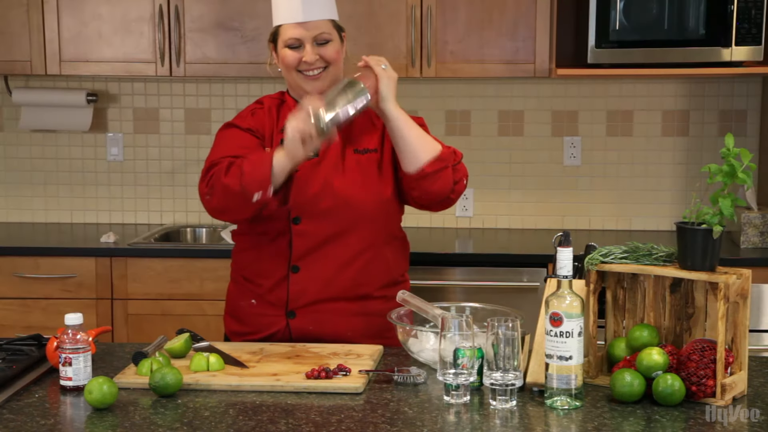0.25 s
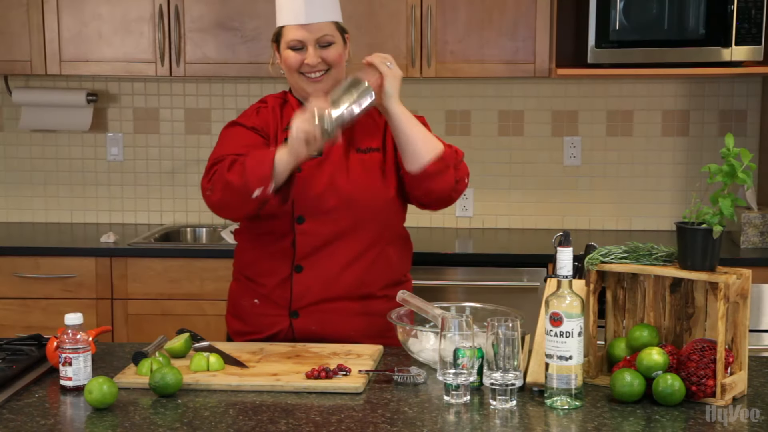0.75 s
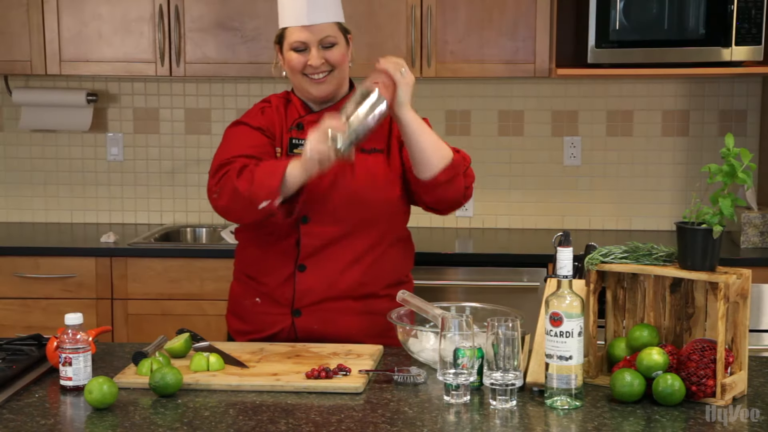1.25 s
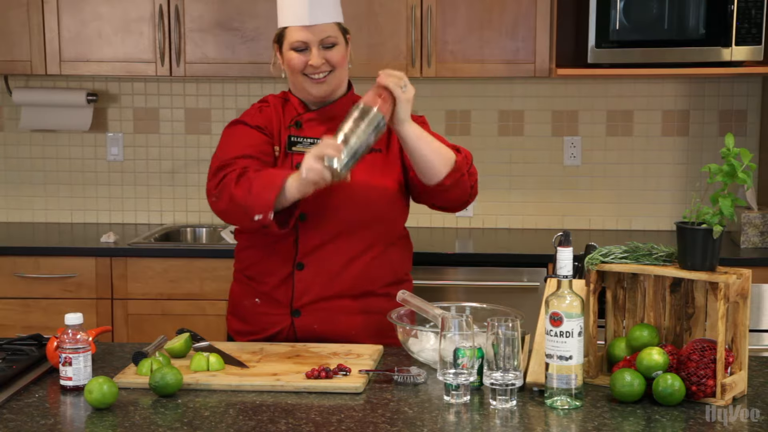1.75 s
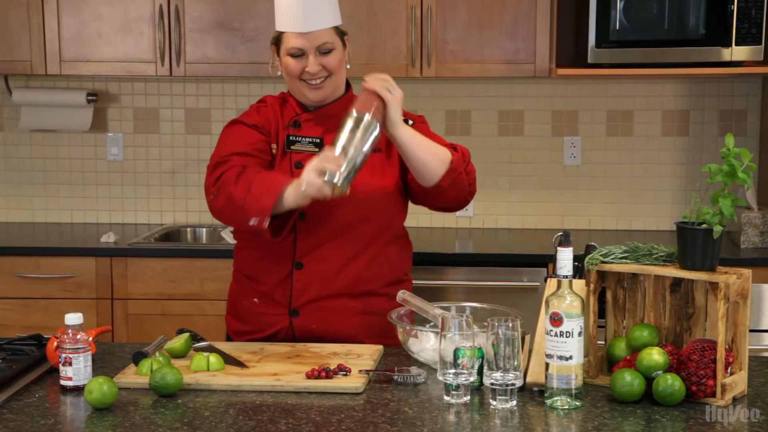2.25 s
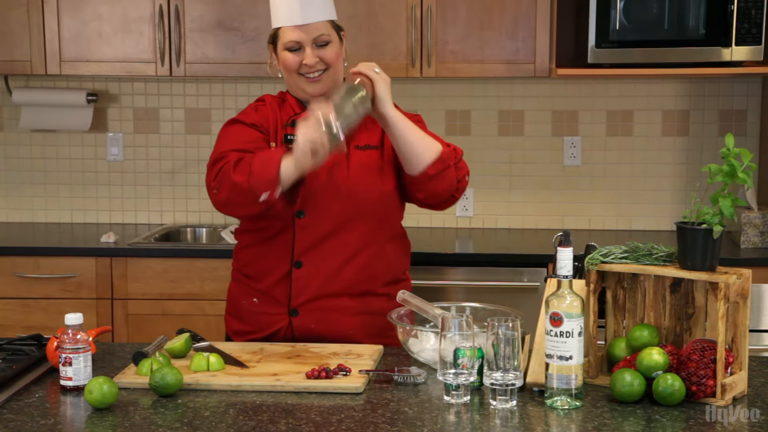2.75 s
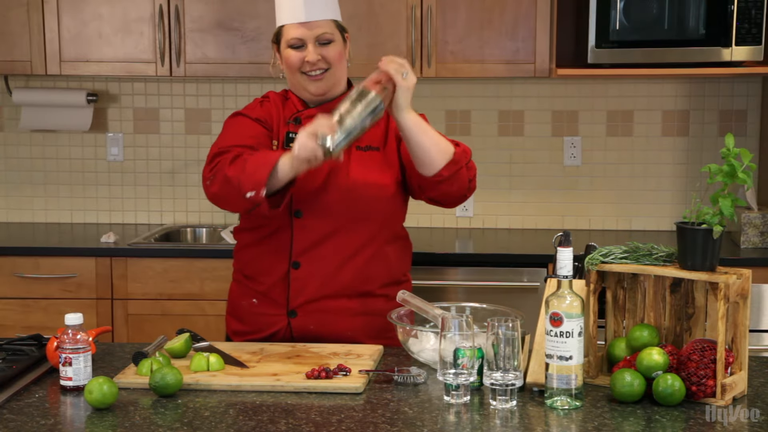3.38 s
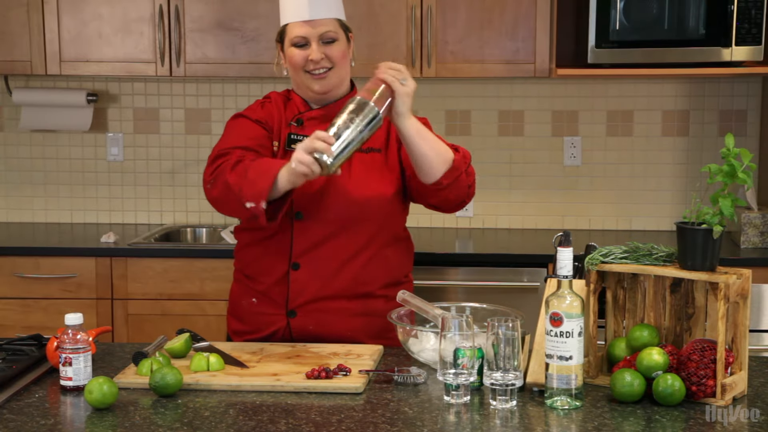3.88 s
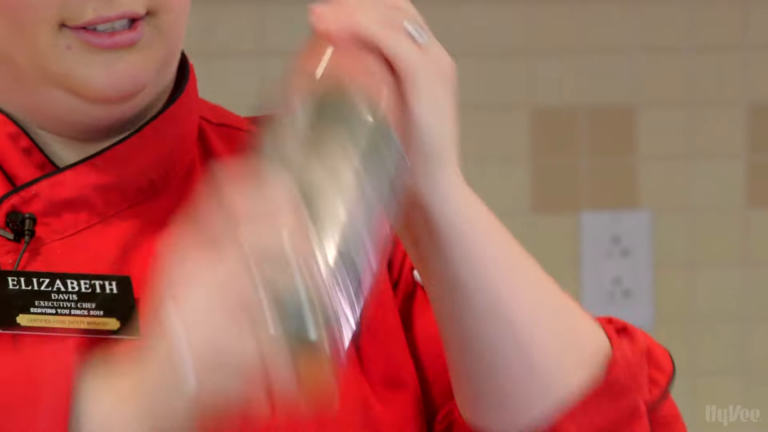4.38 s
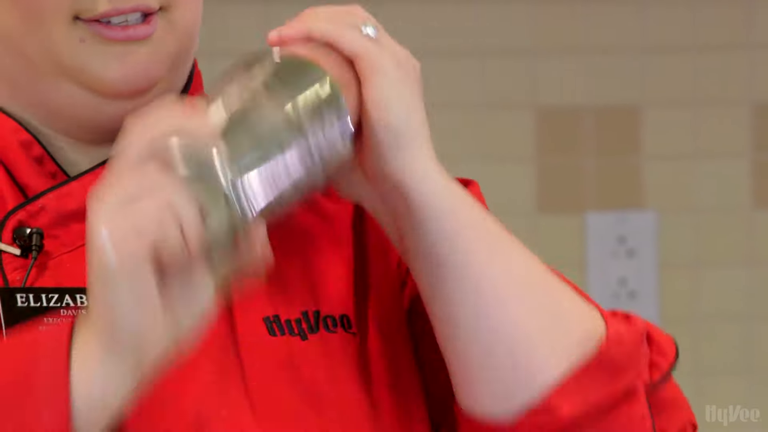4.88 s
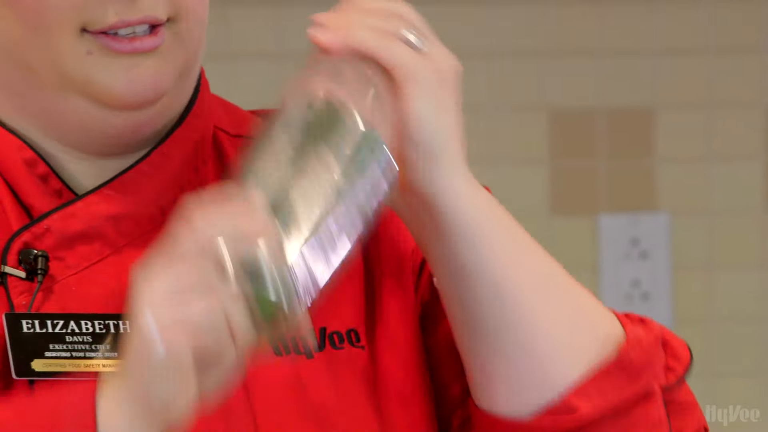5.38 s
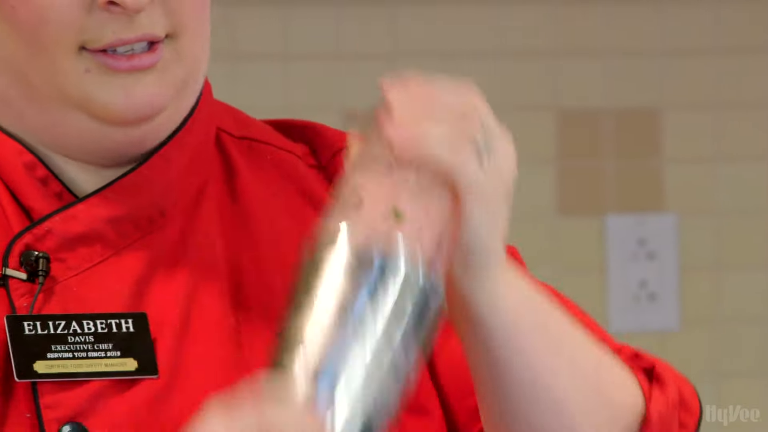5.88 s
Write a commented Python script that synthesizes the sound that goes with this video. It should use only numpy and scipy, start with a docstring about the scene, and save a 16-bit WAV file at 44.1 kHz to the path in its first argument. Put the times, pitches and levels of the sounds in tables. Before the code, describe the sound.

Hard cocktail shaking fills about six seconds, starting mid-action and continuing to the end. Ice and liquid hit the ends of a steel and glass shaker seven or eight times a second, slightly irregularly. Each stroke mixes dense icy ticks, several bright, crunchy clacks and a wet hiss, damped within milliseconds by hands and liquid. Bubbly sloshes are clearest in the first second, with a few more between 2 and 3.4 and near 5.9. Strong knocks and hollow thuds cluster around 1.5; another heavy one lands near 3.9. Strokes soften around 2.9 to 3.4, then recover. Hard clatter stands out around 5.1 to 5.2, and the strongest bursts come around 5.7 to 5.9, with more brittle, splintery treble. One close microphone, slightly left, catches short kitchen reflections and faint low rumble.

```python
"""Hard shake of ice and liquid

Ice and liquid are shaken in a steel tin capped with a glass, at one microphone in a kitchen.
Seven or eight times a second the load reaches an end: chips tick, cubes clatter, liquid sprays.
Knocks and slams are noise-excited modes, damped to milliseconds by hands and liquid; gulps are
sine bubbles, spray and rumble are coloured noise, and the kitchen adds sparse reflections."""
import sys
import numpy as np
from scipy import signal
from scipy.fft import rfft, irfft
from scipy.io import wavfile
from scipy.ndimage import uniform_filter1d

SR = 44100
rng = np.random.default_rng(int(sys.argv[2]) if len(sys.argv) > 2 else 0)


def store_wav(level_fs):
    """Save 16-bit WAV to argv[1]."""
    pcm = np.round(np.clip(np.atleast_2d(level_fs), -1, 1) * 32767)
    wavfile.write(sys.argv[1], SR, pcm.T.astype(np.int16))


N = 270316
RING_SAMPLES, KNOCK_S = 1024, 0.005


def amp(db):
    """Decibels to linear gain."""
    return 10 ** (np.asarray(db) / 20)


def evened(x):
    """Scales a signal to RMS 1."""
    return x / np.sqrt(np.mean(x ** 2) + 1e-20)


def read(points, hz):
    """Joins (frequency, value) points by straight lines over log frequency."""
    point_hz, value = np.transpose(points)
    return np.interp(np.log(hz + 1), np.log(point_hz), value)


def noise(spectrum):
    """Steady coloured noise of RMS 1."""
    hz = np.fft.rfftfreq(N, 1 / SR)
    white = rfft(rng.standard_normal(N))
    return evened(irfft(white * amp(read(spectrum, hz)), N))


def place(start_s, sounds):
    """Sums short sounds, one a row, at their start times."""
    first = np.round(np.clip(start_s, 0, None) * SR).astype(int)
    at = first[:, None] + np.arange(sounds.shape[1])
    return np.bincount(at.ravel(), sounds.ravel(), N)[:N]


def pitches(hz, octaves, count):
    """Random pitches scattered round a centre."""
    return hz * 2 ** (octaves * rng.standard_normal(count))


def strike(modes, pitch_hz, focus_db, vary_db, click, crush_s):
    """Blows on damped modes, one a row, each of RMS 1 if its energy is spread over KNOCK_S."""
    hz = np.fft.rfftfreq(RING_SAMPLES, 1 / SR)
    t = np.arange(RING_SAMPLES) / SR
    count = len(pitch_hz)
    gain = np.zeros((count, len(hz)))
    for centre_hz, width_hz, level_db in modes:
        # the spot hit weights each mode; moving liquid varies its tuning and damping
        spot, load, wet = rng.standard_normal((3, count, 1))
        # a contact favours modes near its own pitch, by focus_db an octave
        away_db = focus_db * abs(np.log2(centre_hz / pitch_hz))[:, None]
        half_width_hz = width_hz * np.exp(0.19 * wet) / 2
        offset = (hz - centre_hz - 0.17 * width_hz * load) / half_width_hz
        gain += amp(level_db + vary_db * spot - away_db) / (1 + offset ** 2)

    # minimum phase: the ring starts at the contact
    log_gain = np.log(np.hstack([gain, gain[:, -2:0:-1]]) + 1e-9)
    causal = np.exp(np.conj(signal.hilbert(log_gain, axis=1)))[:, :len(hz)]

    # a small click, then a brief crunch as the corner of the cube gives way
    age = t / (crush_s * np.exp(0.51 * rng.standard_normal((count, 1))))
    crunch = rng.standard_normal((count, RING_SAMPLES)) * np.sqrt(age) * np.exp(-age)
    contact = click + rfft(crunch / np.linalg.norm(crunch, axis=1, keepdims=True))

    blows = irfft(causal * contact, RING_SAMPLES)
    return blows * np.sqrt(KNOCK_S * SR) / np.linalg.norm(blows, axis=1, keepdims=True)


def bubble(hz, cycles, rise_per_s):
    """Pockets of air ring for a few cycles, rising in pitch; one a row."""
    t = np.arange(2 * RING_SAMPLES) / SR
    turns = hz[:, None] * t * (1 + rise_per_s * t)
    return np.sin(2 * np.pi * turns) * (1 - np.exp(-turns)) * np.exp(-turns / cycles)


# room and moving arms: hz [Hz], density_db [relative dB per Hz]
RUMBLE_SPECTRUM = [(30, 7), (120, -2), (220, -10.5), (380, -7), (900, -38), (18000, -54)]


def rumble():
    """Steady low noise of the room and the moving arms."""
    return amp(-69) * noise(RUMBLE_SPECTRUM)


# strokes of the arms, up or down: arrival_s [s], level_db [relative dB], pile_up_s [s]
ARM_STROKES = [(0.03, -48.5, 0.079), (0.18, -48.5, 0.094), (0.32, -48.0, 0.077), (0.455, -47.5, 0.13),
               (0.629, -53.5, 0.12), (0.719, -50.5, 0.056), (0.885, -50.5, 0.12), (0.999, -49.5, 0.045),
               (1.096, -46, 0.07), (1.227, -51.5, 0.11), (1.361, -49, 0.051), (1.481, -47, 0.12),
               (1.625, -47, 0.083), (1.771, -53.5, 0.11), (1.906, -52, 0.1), (2.056, -49, 0.1),
               (2.167, -46.5, 0.056), (2.326, -47.5, 0.12), (2.449, -48, 0.079), (2.57, -48, 0.059),
               (2.7, -47, 0.11), (2.842, -47.5, 0.048), (2.983, -51, 0.12), (3.089, -53, 0.091),
               (3.227, -55.5, 0.12), (3.388, -53.5, 0.13), (3.485, -48, 0.037), (3.572, -49.5, 0.046),
               (3.664, -47.5, 0.056), (3.793, -50.5, 0.083), (3.958, -49.5, 0.1), (4.055, -50.5, 0.073),
               (4.161, -51, 0.11), (4.26, -52, 0.13), (4.39, -49.5, 0.12), (4.527, -50.5, 0.082),
               (4.678, -51, 0.1), (4.797, -49.5, 0.08), (4.949, -47, 0.092), (5.096, -46.5, 0.084),
               (5.211, -49.5, 0.049), (5.369, -54, 0.11), (5.501, -49, 0.11), (5.64, -48.5, 0.11),
               (5.78, -44.5, 0.067), (5.911, -48.5, 0.096), (5.98, -48, 0.084), (6.103, -48.5, 0.07)]
FLIGHT_DB = -58  # churning while the load is in flight


def churning():
    """Gain per sample: swells and dies away round each stroke, over a constant floor."""
    t = np.arange(0, N / SR + .002, .002)
    arrival_s, level_db, pile_up_s = np.transpose(ARM_STROKES)
    swell = np.exp(-(2 * (t[:, None] - arrival_s) / pile_up_s) ** 2)
    power = (amp(level_db) ** 2 * swell).sum(1) + amp(FLIGHT_DB) ** 2
    return np.interp(np.arange(N) / SR, t, np.sqrt(power))


# mode tables, all: centre_hz [Hz], width_hz [Hz], level_db [relative dB]
# hand-damped shaker wall
WALL_MODES = [(1763, 364, 0.5), (2060, 1130, -9.5), (2807, 354, -7), (3160, 430, -5), (3560, 770, -9)]
# hard ice on steel
SNAP_MODES = [(4220, 1300, -5), (5074, 660, 2), (6070, 770, -11.5), (6510, 1300, -0.5), (7130, 550, -2.5)]
# thin steel ringing under splinters of ice
FIZZ_MODES = [(9300, 2600, 2.5), (11820, 460, -4), (12870, 1400, -1), (15000, 1200, -3),
              (17800, 1500, -0.5)]
# liquid-loaded ends
END_MODES = [(203, 510, 7), (525, 184, -7.5), (733, 240, -7.5), (963, 310, -4)]


def chips(per_s, spread_db):
    """Small pieces tick on the wall and each other, varied in size and colour."""
    start_s = np.flatnonzero(rng.random(N) < per_s / SR) / SR
    size_db = spread_db * np.minimum(rng.exponential(1, len(start_s)), 3)
    layers = (
        (WALL_MODES, 2500, -4),
        (SNAP_MODES, 5700, -6),
        (FIZZ_MODES, 11500, -15),
        (END_MODES, 750, -14),
    )
    out = np.zeros(N)
    for modes, hz, level_db in layers:
        pitch_hz = pitches(hz, 0.2, count=120)
        ticks = strike(modes, pitch_hz, focus_db=13, vary_db=5, click=0.47, crush_s=0.00076)
        gain = amp(size_db + 3.7 * rng.standard_normal(len(start_s)))
        chosen = ticks[rng.integers(0, len(ticks), len(start_s))]
        layer = place(start_s, gain[:, None] * chosen)
        # the pieces share the energy of the stroke
        local_power = abs(uniform_filter1d(layer ** 2, size=3000))
        out += amp(level_db) * layer / np.sqrt(local_power + 0.018 * np.mean(layer ** 2))
    return out * churning()


def froth(per_s):
    """Small bubbles at random instants, following the churning."""
    start_s = np.flatnonzero(rng.random(N) < per_s / SR) / SR
    size, pitch = rng.standard_normal((2, len(start_s)))
    bubbles = bubble(640 * np.exp(0.24 * pitch), cycles=2.54, rise_per_s=1.6)
    mix = place(start_s, amp(9.4 * np.tanh(size))[:, None] * bubbles)
    return amp(-16.5) * evened(mix) * churning()


# liquid and slush: hz [Hz], density_db [relative dB per Hz]
SPRAY_SPECTRUM = [(200, -15), (550, -10), (1300, 7), (1780, 7), (3000, 6), (7000, -5.5), (9000, -5.5),
                  (18000, -32)]


def spray():
    """Liquid and slush hiss as coloured noise, following the churning."""
    return amp(-14.0) * noise(SPRAY_SPECTRUM) * churning()


# level against the stroke, its scatter, snap against ring
CUBE_DB, CUBE_SCATTER_DB, CUBE_SNAP_DB = 1.5, 1.5, -3.5
CUBE_SPREAD, CUBE_HZ = 1.25, 2600  # landing span in pile-up lengths, centre pitch


def light_cubes(count):
    """Lighter cubes land one after another at each stroke, struck like the whole cubes."""
    arrival_s, level_db, pile_up_s = np.repeat(ARM_STROKES, count, axis=0).T
    total = len(arrival_s)
    turn = (np.arange(total) % count + rng.random(total)) / count - .5
    force, pitch, snap = rng.standard_normal((total, 3)).T
    start_s = arrival_s + CUBE_SPREAD * pile_up_s * turn
    wall_db = level_db + CUBE_DB + CUBE_SCATTER_DB * force
    wall_hz = CUBE_HZ * 2 ** (0.2 * pitch)
    snap_db = wall_db + CUBE_SNAP_DB + 3.1 * snap
    return knocks(np.transpose([start_s, wall_db, wall_hz, snap_db]))


# hardest knocks of whole cubes:
# start_s [s], wall_db [relative dB], wall_hz [contact pitch, Hz], snap_db [relative dB]
HARD_KNOCKS = [(0.064, -47, 2780, -43), (0.0763, -47.5, 2700, -42), (0.3089, -36.5, 2840, -39.5),
               (0.3374, -40, 2120, -40), (0.403, -46, 2930, -50), (0.488, -40.0, 2670, -65),
               (0.5981, -42.5, 2520, -46), (0.6261, -49, 3060, -38), (0.7161, -40, 2250, -54),
               (0.8003, -42.5, 2380, -47), (0.9357, -57, 2890, -43.5), (1.096, -36.5, 3050, -43.5),
               (1.2344, -45.5, 2770, -43.5), (1.33, -46.0, 2470, -57), (1.3816, -40.5, 2390, -45),
               (1.391, -37.5, 2640, -47), (1.4155, -42.5, 3040, -41), (1.478, -37.5, 2820, -53),
               (1.4861, -36, 2490, -46.5), (1.5662, -45, 1930, -43), (1.5973, -39, 3100, -38.5),
               (1.645, -44.5, 2630, -44.5), (1.6757, -41.5, 2650, -45), (1.7657, -43.5, 2430, -50.5),
               (1.8961, -42, 2700, -41), (2.1736, -45, 2190, -51.0), (2.1967, -42.0, 2640, -42.5),
               (2.3, -45.5, 2940, -52.5), (2.3161, -36.5, 2580, -55), (2.3631, -42, 1950, -53.0),
               (2.4245, -41, 2720, -37.5), (2.502, -43.0, 2490, -44), (2.5501, -47, 3140, -48.0),
               (2.5814, -43.0, 3000, -50), (2.6789, -40.5, 2950, -45.5), (2.8091, -41.0, 2650, -44.5),
               (2.8402, -41, 2660, -48), (2.863, -42.5, 2150, -61), (3.0016, -41.5, 2350, -41),
               (3.043, -43.5, 2920, -44.5), (3.0905, -37.5, 2770, -46), (3.1351, -42.5, 2460, -50.0),
               (3.1987, -40.5, 2100, -57), (3.2432, -43, 2530, -54), (3.3254, -45.5, 3080, -46.0),
               (3.3469, -42, 2900, -43.0), (3.4644, -48.0, 2590, -46.5), (3.541, -40.5, 2760, -45),
               (3.5578, -38, 3220, -40), (3.651, -42.5, 2190, -50), (3.7407, -41.5, 2030, -68),
               (3.8098, -43, 2800, -47.5), (3.8894, -40.5, 2800, -50), (3.9464, -41.5, 2870, -44),
               (3.9743, -42, 2900, -56), (4.0312, -46, 2580, -43.5), (4.0406, -44.0, 2570, -41),
               (4.076, -45, 3030, -41.5), (4.1263, -39.5, 2290, -43.5), (4.136, -44.0, 2830, -42),
               (4.1487, -38.5, 2840, -40.0), (4.2514, -44, 2170, -55), (4.2818, -45.5, 2580, -47.5),
               (4.428, -38.5, 2860, -43), (4.4424, -45, 2750, -47.5), (4.51, -41, 3050, -46.0),
               (4.5379, -38.5, 2570, -44.5), (4.624, -48, 2990, -45), (4.6352, -40, 2340, -38.5),
               (4.7759, -48, 2720, -43), (4.9146, -40.0, 2400, -43), (4.9256, -46.5, 2650, -42),
               (4.9486, -44.5, 2370, -45), (4.957, -40, 2750, -45), (5.0606, -44, 2900, -42.5),
               (5.0721, -36, 2290, -40.5), (5.1, -39.5, 3000, -41.5), (5.1719, -39.5, 1840, -48),
               (5.1916, -39.5, 1840, -48), (5.2047, -42, 3200, -47.5), (5.226, -37, 2670, -39.5),
               (5.51, -45.5, 2310, -48), (5.5359, -41, 2590, -43), (5.5961, -46.5, 2490, -45),
               (5.6611, -34.5, 2570, -45.0), (5.7463, -41, 2070, -44), (5.7774, -39, 2560, -40),
               (5.7896, -38, 2990, -40), (5.8055, -48, 3050, -39.5), (5.859, -39.5, 2500, -50),
               (5.8765, -39.5, 2880, -48), (5.8965, -41.5, 2840, -44), (5.9362, -41, 2680, -42),
               (5.9477, -39.5, 2760, -46.5), (6.0174, -39, 2260, -51.5)]


def knocks(rows):
    """Cubes hit the shaker: the wall and ends ring, the ice snaps and splinters."""
    start_s, wall_db, wall_hz, snap_db = np.transpose(rows)
    count = len(start_s)
    snap_hz = pitches(5560, 0.29, count)
    fizz_hz = pitches(10900, 0.29, count)
    body_hz = pitches(790, 0.37, count)
    wall = strike(WALL_MODES, wall_hz, focus_db=21.0, vary_db=1.0, click=0.56, crush_s=0.0013)
    snap = strike(SNAP_MODES, snap_hz, focus_db=16.0, vary_db=1.5, click=0.38, crush_s=0.0012)
    fizz = strike(FIZZ_MODES, fizz_hz, focus_db=18, vary_db=3.5, click=0.3, crush_s=0.0019)
    body = strike(END_MODES, body_hz, focus_db=13.0, vary_db=4.5, click=1, crush_s=0.002)
    # splinters follow the blow, louder with time as the ice breaks up
    blow_db = np.maximum(snap_db - 14.5, wall_db - 20.0)
    fizz_db = blow_db + 0.65 * start_s + 2.8 * rng.standard_normal(count)
    ring = amp(wall_db - 0.5)[:, None] * (wall + amp(-12.5) * body)
    crack = amp(snap_db - 0.6)[:, None] * snap + amp(fizz_db)[:, None] * fizz
    return place(start_s - .0005, ring + crack)


# loudest sloshes: start_s [s], level_db [relative dB], pitch_hz [centre, Hz]
SLOSHES = [(0.182, -46.5, 910), (0.445, -47.5, 760), (0.72, -47.5, 870), (0.987, -43, 786),
           (2.017, -52.5, 815), (2.135, -50.5, 780), (2.844, -49, 848), (3.131, -47.5, 910),
           (3.412, -49, 720), (5.941, -49.5, 593)]


def gulps():
    """Each slosh folds in air that breaks into a clump of nine bubbles."""
    start_s, level_db, pitch_hz = np.repeat(SLOSHES, repeats=9, axis=0).T
    late, size = rng.standard_normal((len(start_s), 2)).T
    bubbles = bubble(pitch_hz * np.exp(0.12 * size), cycles=1.75, rise_per_s=2.3)
    return place(start_s - .003 + 0.008 * late, amp(level_db + 8.0)[:, None] * bubbles)


# heaviest slams, dull or hollow: start_s [s], level_db [relative dB], pitch_hz [Hz]
HEAVY_SLAMS = [(0.338, -51.5, 650), (0.489, -48.5, 615), (0.625, -52, 280), (1.479, -41, 860),
               (1.491, -40.5, 710), (1.549, -45, 660), (1.596, -48, 335), (1.757, -45.5, 870),
               (1.897, -49, 407), (2.425, -48.5, 450), (2.502, -50, 398), (2.55, -45, 676),
               (2.679, -47, 477), (3.002, -50, 392), (3.644, -45.5, 865), (3.889, -41.5, 715),
               (4.077, -49, 425), (4.498, -47.5, 404), (5.048, -44.5, 794), (5.06, -47.5, 760),
               (5.805, -46.5, 454), (5.95, -48, 530)]


def slams():
    """The whole load stops at one end and thuds on its low modes."""
    start_s, level_db, pitch_hz = np.transpose(HEAVY_SLAMS)
    thuds = strike(END_MODES, pitch_hz, focus_db=24.5, vary_db=3.5, click=1.75, crush_s=0.0011)
    return place(start_s, amp(level_db)[:, None] * thuds)


# kitchen decay: hz [Hz], t60_s [s]
KITCHEN_DECAY = [(3000, 0.079), (16000, 0.19)]


def kitchen(x):
    """Sparse reflections from counter, tiles and cupboards, decaying at a rate set by frequency."""
    taps = rng.choice([-1., 1.], SR // 2) * (rng.random(SR // 2) < 3000 / SR)
    taps[:round(.004 * SR)] = 0
    hz, t, bins = signal.stft(taps, SR, nperseg=256)
    decay = amp(-60 * t / read(KITCHEN_DECAY, hz)[:, None])
    tail = signal.istft(bins * decay, SR, nperseg=256)[1]
    return signal.fftconvolve(x, tail / np.linalg.norm(tail))[:N]


def scene():
    """Shaker, its reflections and rumble in mono, then set a little to the left."""
    ice = chips(per_s=280, spread_db=6.0) + light_cubes(count=2) + knocks(HARD_KNOCKS)
    liquid = froth(per_s=260) + spray() + gulps()
    shaker = ice + liquid + slams()
    mono = shaker + amp(-13.5) * kitchen(shaker) + rumble()
    return mono * amp([[1.8], [-2.2]])  # left, right


EDGE_HZ = 18200


def record(dry):
    """Band limit: a linear-phase lowpass at EDGE_HZ."""
    lowpass = signal.firwin(511, EDGE_HZ, window=("kaiser", 9), fs=SR)
    return signal.oaconvolve(dry, lowpass[None], "same")


dry = scene()
out = record(dry)
store_wav(out)
```